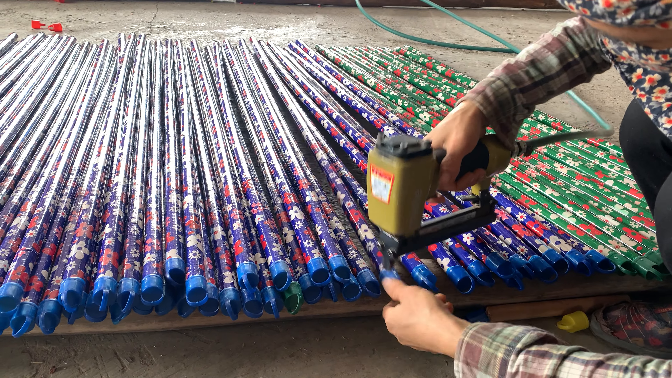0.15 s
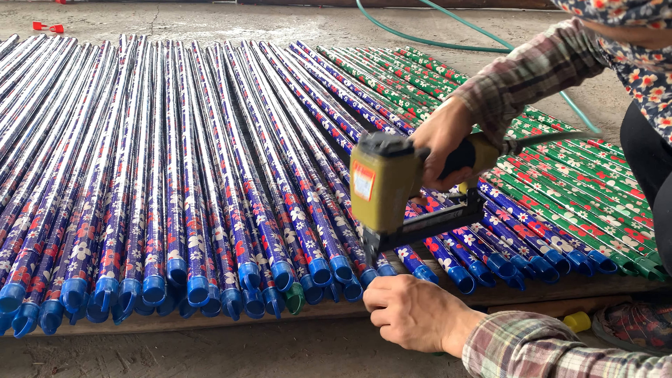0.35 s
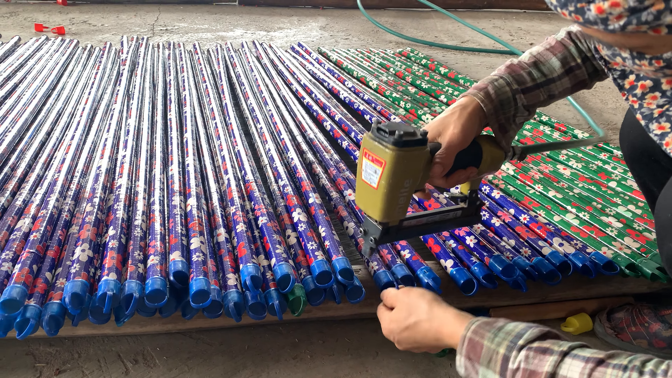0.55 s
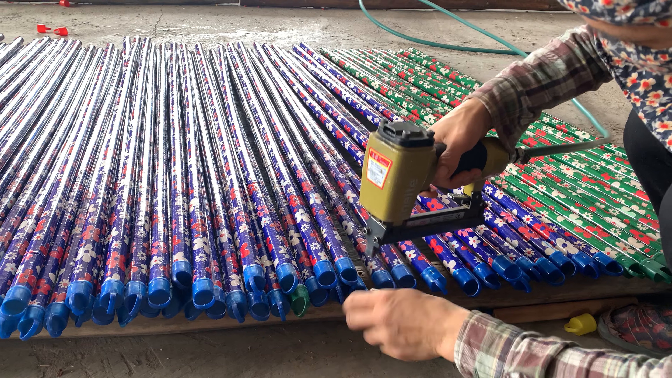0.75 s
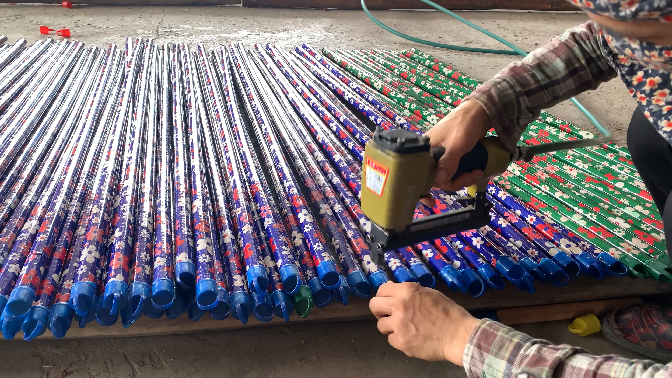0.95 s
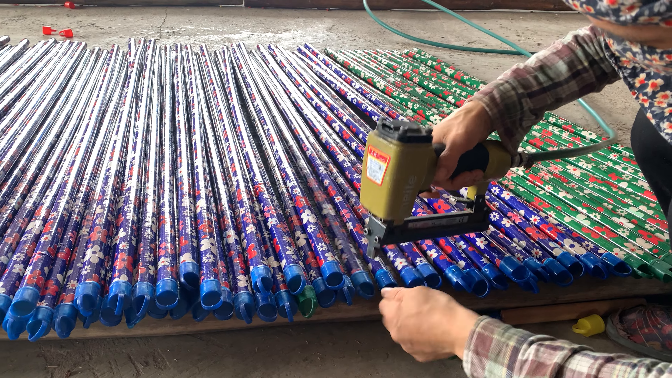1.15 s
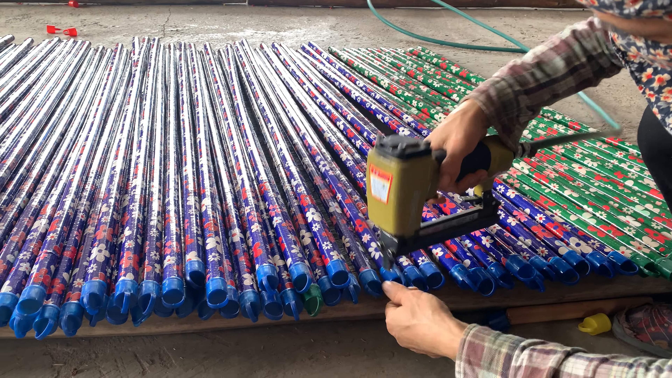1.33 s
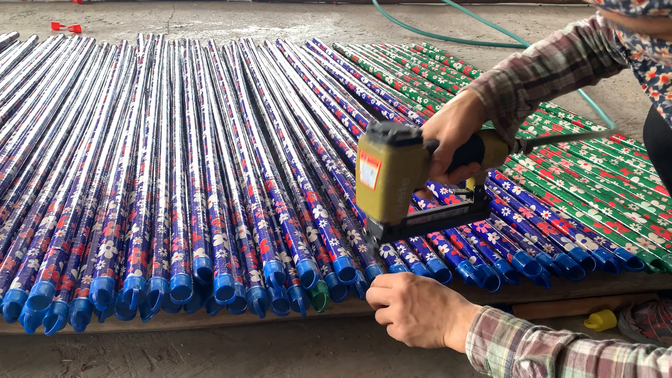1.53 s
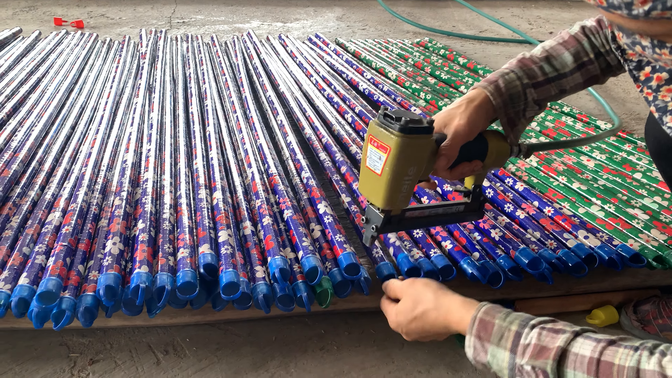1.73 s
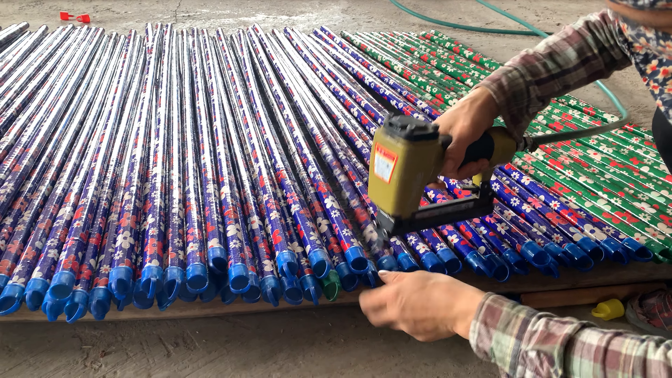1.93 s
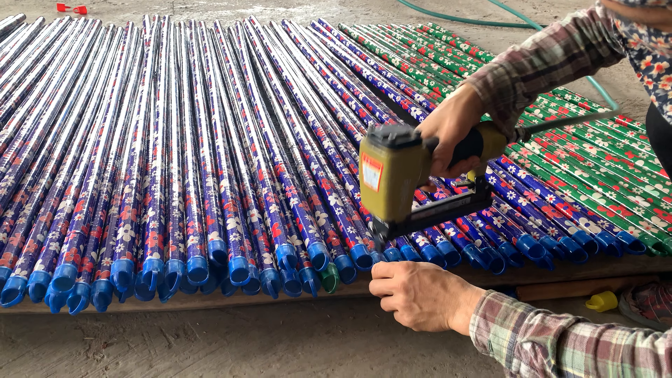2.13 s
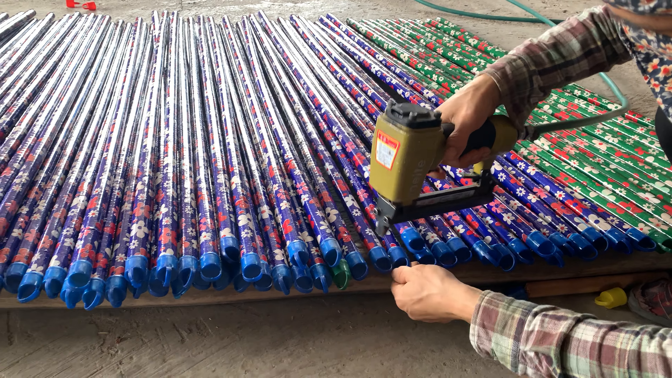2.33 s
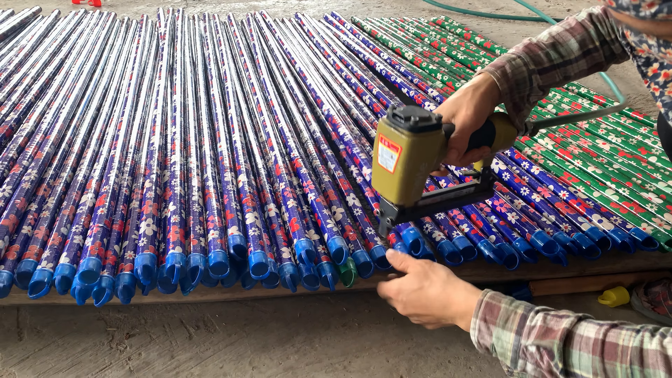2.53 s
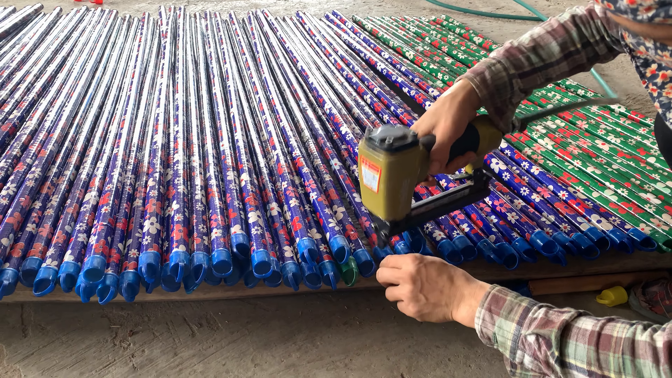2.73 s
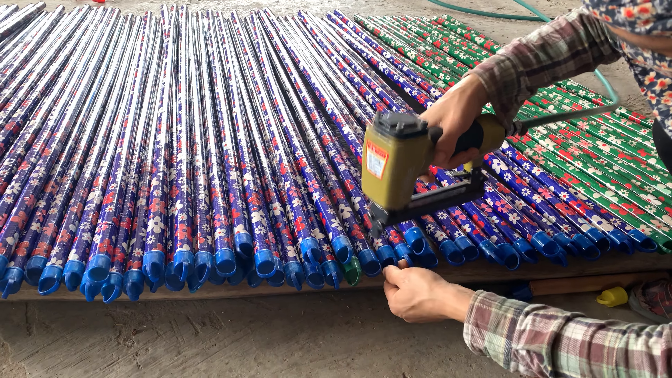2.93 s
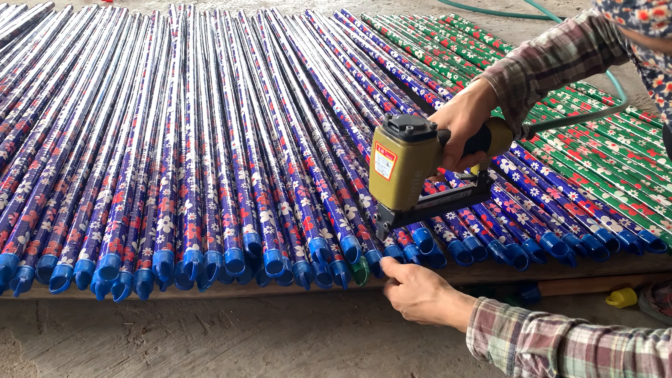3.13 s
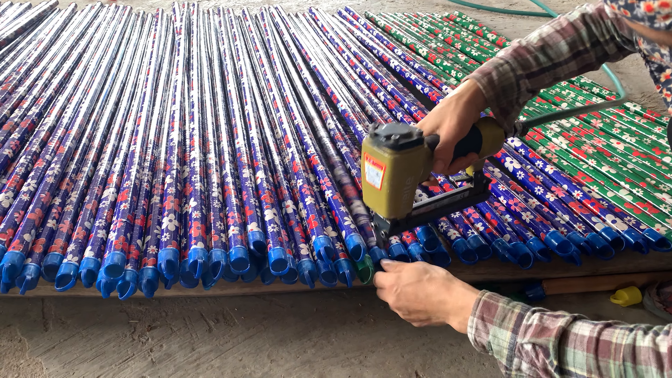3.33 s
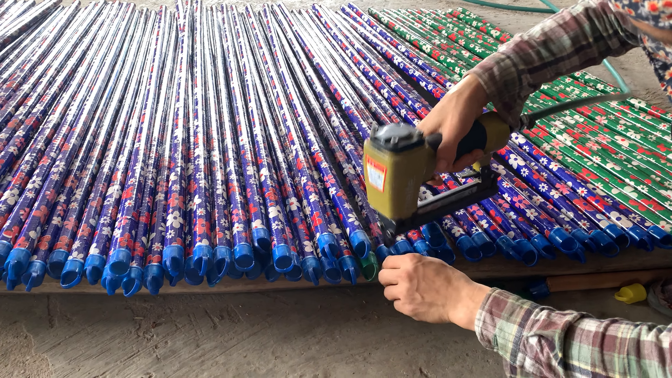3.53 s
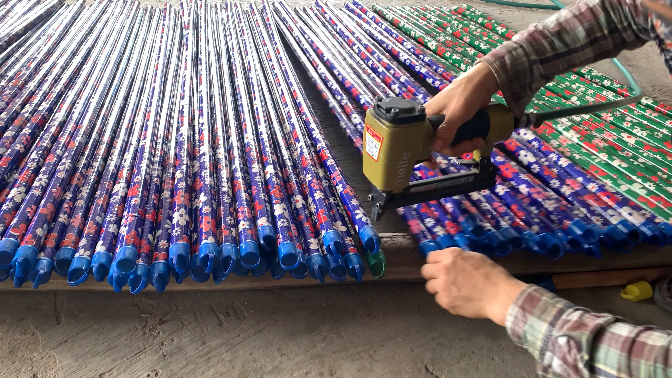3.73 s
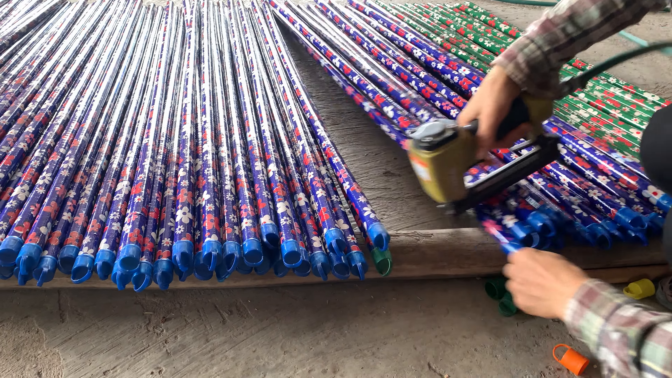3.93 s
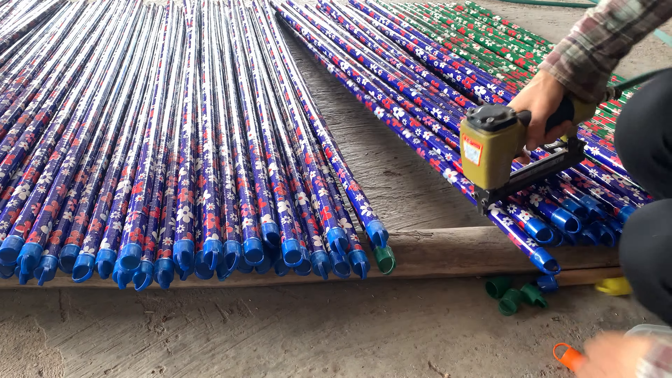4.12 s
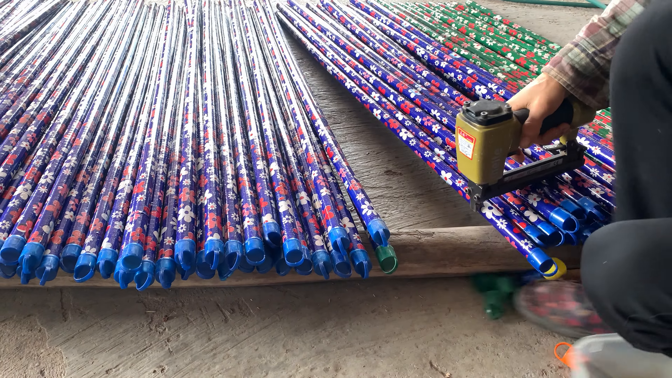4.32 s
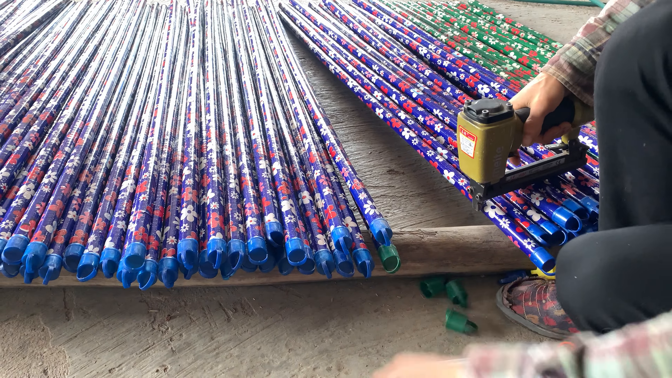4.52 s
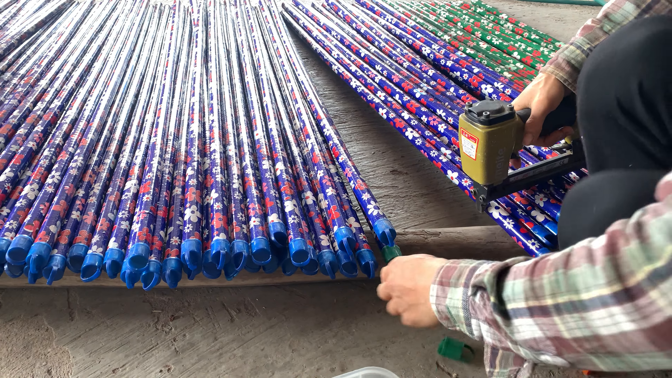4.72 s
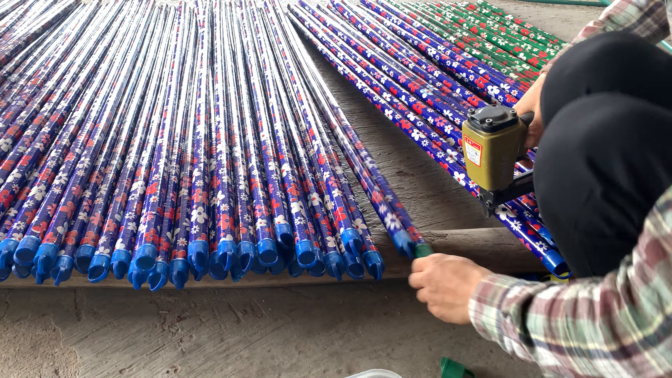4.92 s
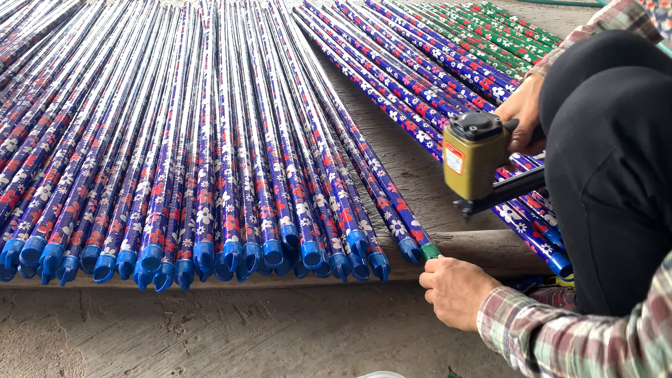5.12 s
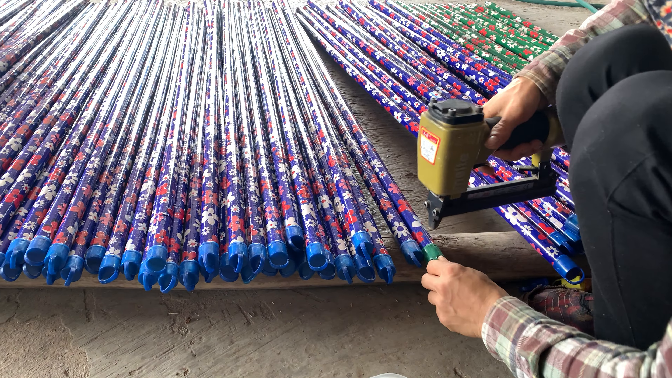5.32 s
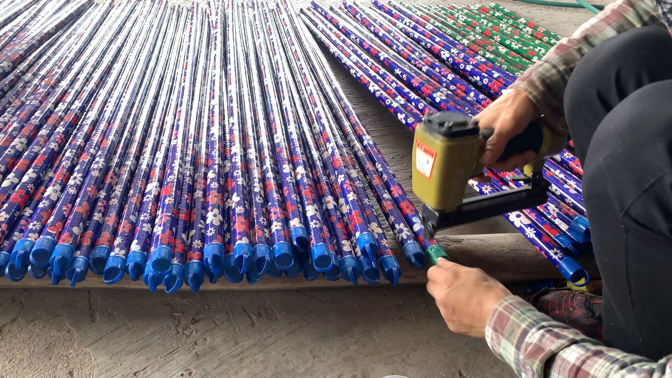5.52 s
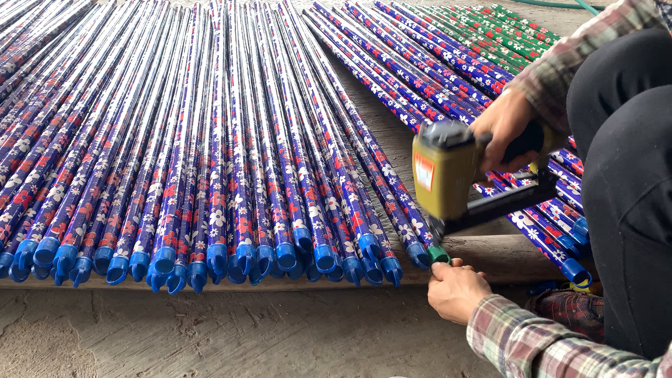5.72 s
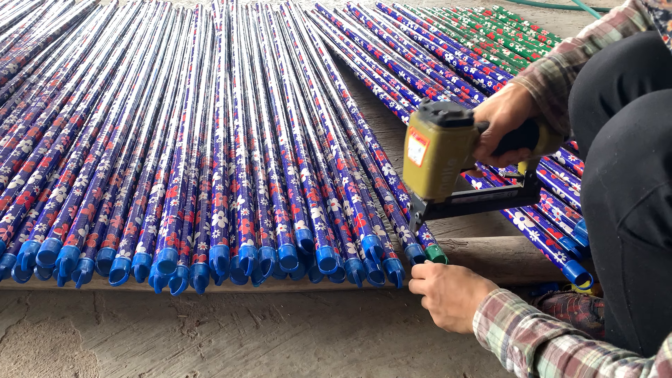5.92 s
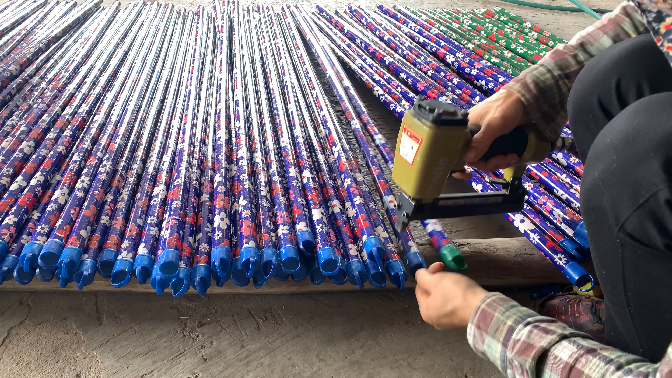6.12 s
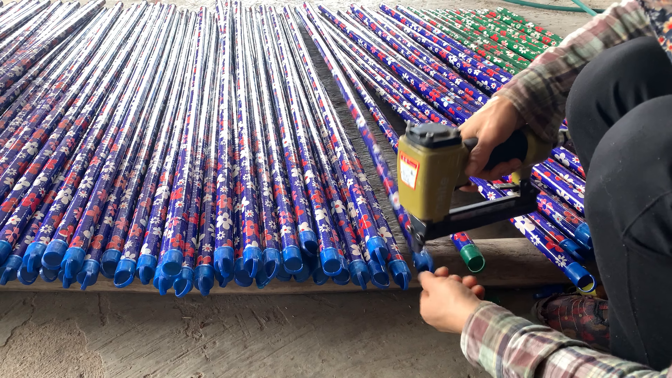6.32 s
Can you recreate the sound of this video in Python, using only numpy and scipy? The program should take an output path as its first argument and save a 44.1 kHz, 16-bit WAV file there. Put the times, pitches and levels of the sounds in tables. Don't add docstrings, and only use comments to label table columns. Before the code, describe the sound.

Close nail gun shots snap about four a second with puffing exhaust and brief tube ringing in a large shed, stop for handling taps, then restart.

```python
import sys
import numpy as np
from scipy import signal
from scipy.fft import rfft, irfft, next_fast_len
from scipy.io import wavfile
from scipy.ndimage import uniform_filter1d, map_coordinates

SR = 44100
rng = np.random.default_rng(int(sys.argv[2]) if len(sys.argv) > 2 else 0)


def to_wav(s):
    ch = np.atleast_2d(s).T
    pcm = np.round(np.clip(ch, -1, 1) * 32767)
    wavfile.write(sys.argv[1], SR, pcm.astype(np.int16))


def to_linear_factor(level_db):
    exponent = np.asarray(level_db, float) / 20
    return 10 ** exponent


N = 284886
EARLY = SR // 5
M = N + EARLY + SR


def unit(x):
    return x / np.sqrt(np.mean(x ** 2) + 1e-20)


def along(points, hz, axis=1):
    columns = np.transpose(points)
    return np.interp(np.log(hz + 1), np.log(columns[0] + 1), columns[axis])


def filtered(x, response):
    size = next_fast_len(x.shape[-1] + 8192)
    hz = np.fft.rfftfreq(size, 1 / SR)
    return irfft(rfft(x, size) * response(hz), size)[..., :x.shape[-1]]


# freq_hz, likeness (0 to 1)
NEAR = [(100, 0.95), (700, 0.71), (1900, 0.39), (3000, 0.64), (4200, 0.067), (7400, 0.61), (9000, 0.91),
        (15000, 0.93)]
# freq_hz, likeness (0 to 1)
FAR = [(60, 0.71), (130, 1), (290, 0.92), (640, 0.073), (1410, 0.049), (3100, 0.045), (6820, 0.11),
       (15000, 0.73)]


def spread(pair, alike):
    def weights(hz):
        turn = np.arccos(np.clip(along(alike, hz), -1, 1)) / 2
        return np.array([np.cos(turn), np.sin(turn)])

    mid, side = filtered(pair, weights)
    return np.array([mid + side, mid - side])


def rush(spectrum, alike):
    noise = rng.standard_normal((2, M))
    return unit(spread(filtered(noise, lambda hz: to_linear_factor(along(spectrum, hz))), alike))


def wobble(rate):
    knots = rng.standard_normal(int(M * rate / SR) + 4)
    return map_coordinates(knots, [np.arange(M) * rate / SR], order=1)


def grit(slow_db, fast_db):
    return to_linear_factor(slow_db * wobble(40) + fast_db * wobble(350))


def add(track, s, x):
    track[EARLY + round(s * SR):][:len(x)] += x


def shape(points, db):
    s, level_db = np.transpose(points)
    return s[0], to_linear_factor(db + np.interp(np.arange(s[0], s[-1], 1 / SR), s, level_db))


def swell_and_fall(t, db, rise_s, fall_s):
    return to_linear_factor(db + 20 * np.where(t < 0, t / rise_s, -t / fall_s))


SHARP = dict(attack=.0004, crest=.0007)
SOLID = dict(vary_db=1, detune=.02)
LOOSE = dict(vary_db=2, detune=.015, rough=.4)
LONG = dict(vary_db=1, detune=.002, rough=.2)


def ring(modes, attack, vary_db, detune, rough=0, crest=0):
    t = np.arange(SR // 4) / SR
    luck = rng.standard_normal((len(modes), 2))
    steps = rng.standard_normal((len(modes), 64))
    tones = 0
    for (hz, db, t60), (level_luck, pitch_luck), step in zip(modes, luck, steps):
        drift = rough * np.interp(t, np.linspace(0, t[-1], len(step)), np.cumsum(step))
        swing = 2 * np.pi * hz * (1 + detune * pitch_luck) * (t - crest) + drift
        wave = np.cos(swing) if crest else np.sin(swing)
        tones = tones + to_linear_factor(db + vary_db * level_luck - 60 * t / t60) * wave
    return tones * (1 - np.exp(-t / attack))


def resonant(x, peaks, plain_db):
    def response(hz):
        total = to_linear_factor(plain_db)
        for k, (centre, width, db) in enumerate(peaks):
            damping = 1j * hz * width
            total = total + (-1) ** k * to_linear_factor(db) * damping / (centre * centre - hz * hz + damping)
        return total

    return unit(filtered(x, response))


def boom(high_hz, low_hz, glide, t60):
    t = np.arange(SR // 4) / SR
    hz = low_hz + (high_hz - low_hz) * np.exp(-t / glide)
    return to_linear_factor(-60 * t / t60) * np.sin(2 * np.pi * np.cumsum(hz) / SR)


# start_s, blow_db, tube_ring_db, tube_pitch_hz, thump_db
SHOTS = [(-0.09, -13, -24.5, 1560, -31.5), (0.1938, -15.5, -29, 1496, -33.5),
         (0.4553, -15.5, -24.5, 1410, -36), (0.717, -14.5, -25, 1694, -33.5),
         (1.1084, -16, -20.5, 1820, -26.5), (1.3818, -16.5, -26.5, 1844, -38.5),
         (1.6738, -16, -29, 1427, -36.5), (1.9361, -16, -24.5, 1466, -31),
         (2.2298, -16, -27.5, 1500, -37.5), (2.4996, -16, -25.5, 1385, -39.5),
         (2.8066, -15, -23, 1548, -36.5), (3.085, -14.5, -32, 1460, -35), (3.366, -15, -28, 1410, -36.5),
         (3.6216, -16, -23, 1680, -38), (5.529, -17.5, -20, 1615, -29), (5.8064, -16, -30, 1620, -30),
         (6.0871, -15, -27, 1556, -37), (6.3595, -16.5, -27.5, 1564, -36.5)]
# housing_hz, trigger_hiss_db, thud_db, crack_db
GRIP = [(980, -2, 3.5, 2.5), (991, -2, 4.5, -0.5), (958, 0.5, -7.5, 0.5), (988, 0, 2.5, 0.5),
        (1030, 2, 3, 1), (940, 0, 4.5, 0), (964, 2.5, -2.5, 0.5), (970, 1, -1, 0), (961, 1.5, -3.5, 0),
        (950, -2, 6.5, 0.5), (955, 1, 5, 0), (977, 0, 3, 0.5), (969, -0.5, 1.5, 0.5), (986, 1, 3, 0),
        (1020, 0, 1.5, -1), (915, 3, -3, -0.5), (966, 3.5, 7.5, -0.5), (982, 0, -2.5, -0.5)]
# pitch_hz, level_db, t60_s
HOUSING = [(975, -4, 0.011), (1540, -7.5, 0.0044), (2480, 2.5, 0.0021), (3700, -17.5, 0.0087)]
# pitch_hz, level_db, t60_s
THUD = [(230, -9, 0.013), (310, -2, 0.024), (503, -5.5, 0.028)]
THUD_DB, THUD_GROWS = -29.5, 0.85


def knocks():
    body = np.zeros(M)
    for (s, knock_db, _, _, thump_db), (grip_hz, _, thud_db, _) in zip(SHOTS, GRIP):
        housing = [(grip_hz, *HOUSING[0][1:])] + HOUSING[1:]
        add(body, s + 0.00077, to_linear_factor(knock_db + 13) * ring(housing, **SHARP, vary_db=1.0, detune=.006))
        blow_db = THUD_DB + thud_db + THUD_GROWS * (thump_db + 33)
        add(body, s + 0.00393, -to_linear_factor(blow_db) * ring(THUD, attack=0.00045, **SOLID))
        bend = boom(high_hz=380, low_hz=55, glide=0.0034, t60=0.093)
        add(body, s + 0.00535, to_linear_factor(thump_db + 9.5) * bend)
    return body


# delay_s, level_db, rise_s, fall_s (per 20 dB)
SNAP = [
    (0, -24.5, 0.089, 0.0087),
    (.001, -1, .0006, 0.004),
    (.0042, 5.5, .0004, .0018),
    (.0062, -5, .001, 0.0074),
]
# freq_hz, density_db_per_hz
CRACK = [(600, -21), (2000, -6), (3000, -11), (4000, -16), (6900, -11.5), (7800, -5.5), (9900, -5.5),
         (14100, -9), (15300, -19.5), (16900, -45)]
# freq_hz, density_db_per_hz
HISS = [(1000, -21), (3000, -13.5), (7500, -4), (14000, -4), (16500, -40)]
BLOW_DB, CRACK_DB, CRACK_GROWS = -15.5, -12.5, 0.48
TRIGGER_S = 0.015


def cracks():
    air, hiss = np.zeros((2, M))
    for (s, knock_db, *_), (_, hiss_db, _, crack_db) in zip(SHOTS, GRIP):
        for delay, db, rise, fall in SNAP:
            t = np.arange(SR // 5) / SR - TRIGGER_S - delay
            db = db + (crack_db if delay else hiss_db)
            db = db + CRACK_DB + CRACK_GROWS * (knock_db - BLOW_DB)
            add(air if delay else hiss, s - TRIGGER_S, swell_and_fall(t, db, rise, fall))
    return air * to_linear_factor(1.6 * wobble(1500)) * rush(CRACK, NEAR) + hiss * rush(HISS, NEAR)


# t60_s, second_hz, second_db, third_hz, third_db
TONES = [(.05, 1251, -9, 2580, -3), (.05, 1394, -4.5, 1174, -5.5), (.05, 2000, 3, 1610, -14),
         (.05, 2025, 1, 1350, -12.5), (.05, 1470, -5.5, 2648, -4), (.05, 1414, -9.5, 1166, -10.5),
         (.05, 1740, -7.5, 1132, -3.5), (.05, 1768, -7, 1600, -16), (.05, 2184, -3, 1284, -10),
         (.05, 2033, -1.5, 1698, -4.5), (.075, 2250, -3.5, 1850, -11), (.05, 2240, 2.5, 1704, -2.5),
         (.05, 1683, 0.5, 2013, -12.5), (.05, 1400, -8, 2030, -14.5), (.06, 1280, -12, 2300, -9),
         (.06, 1287, -5.5, 1460, -11), (.05, 2320, -1, 1250, -9), (.05, 1690, -5, 1448, -13)]
# first_hz, first_db, second_hz, second_db, third_hz, third_db
LINGER = [(1174, -51, 1793, -54, 1416, -54), (904, -49, 1510, -51, 1179, -53),
          (1445, -49, 1607, -49, 2040, -51), (1375, -49, 2024, -53, 980, -53),
          (1246, -48, 1900, -49, 1470, -49), (1160, -48, 1849, -49, 1418, -49),
          (1174, -51, 1793, -54, 1416, -54), (1453, -50, 1768, -52, 977, -54),
          (1871, -52, 1319, -54, 2546, -56), (1402, -52, 1698, -54, 2772, -57),
          (1553, -41, 2248, -49, 1233, -50), (1305, -53, 964, -54, 1610, -55),
          (1688, -51, 1400, -51, 1128, -57), (1822, -52, 1561, -53, 1289, -54),
          (1615, -41, 1268, -45, 2288, -46), (1602, -44, 999, -49, 1319, -51),
          (1553, -47, 2280, -50, 1235, -51), (1314, -53, 697, -53, 1588, -53)]
# start_s, level_db, pitch_hz, t60_s
REBOUNDS = [(5.568, -42, 1500, 0.095), (5.568, -40, 1620, 0.084), (5.57, -37, 2900, 0.074),
            (5.545, -43, 700, 0.065), (5.575, -42, 1600, 0.13), (6.37, -43, 697, .14),
            (5.57, -45, 2730, .25), (5.59, -46, 3600, 0.16), (5.595, -46, 3200, 0.072),
            (5.602, -47, 2700, .07), (3.6, -44, 2500, 0.054), (2.856, -42, 1600, .06),
            (3.17, -42, 1600, 0.093), (2.8, -38, 1700, .07), (2.6, -43.5, 1400, .06),
            (0.65, -38.5, 1850, .05), (1.153, -44, 1820, .04), (1.16, -43.5, 1200, 0.065),
            (6.349, -40, 1600, 0.0301), (6.304, -37, 1620, .04), (6.09, -26.5, 325, 0.046),
            (3, -44.5, 2000, .04), (3.8, -48, 1900, .04)]
RING_SHARE = 0.88
LINGER_DB, LINGER_S = 10, .16


def tubes_ring():
    tubes = np.zeros((2, M))
    for (s, _, tube_db, tube_hz, _), (t60, hz2, db2, hz3, db3), last in zip(SHOTS, TONES, LINGER):
        t60 = RING_SHARE * t60
        tube = [(tube_hz, 3, t60), (hz2, 3 + db2, t60), (hz3, 3 + db3, t60)]
        linger = [(hz, db + LINGER_DB, LINGER_S) for hz, db in zip(last[::2], last[1::2])]
        for side in tubes:
            add(side, s + 0.0086, to_linear_factor(tube_db + 5.5) * ring(tube, attack=0.0027, **LONG))
            add(side, s + .006, ring(linger, attack=.012, **LONG))
    for s, db, hz, t60 in REBOUNDS:
        for side, nearer_db in zip(tubes, (0, 5)):
            add(side, s, to_linear_factor(db + nearer_db) * ring([(hz, 0, t60)], attack=.002, **LONG))
    return tubes


# time_s, level_db
JOSTLE = [(.003, -28), (.006, 2.5), (.012, -2), (.022, -15), (.09, -27.5), (.16, -50.5)]
# freq_hz, density_db_per_hz
ROW = [(400, -22), (800, -11), (1500, -10), (2300, -9), (4000, -13.5), (5500, -20.5), (16000, -52)]
# pitch_hz, width_hz, level_db
NEIGHBOURS = [(1210, 17, -8.5), (1410, 56, 3), (1470, 50, -2), (1680, 31, 2.5), (2013, 29, -9),
              (2130, 66, -4.5), (2320, 16, -10), (2640, 120, -0.5), (3400, 39, -14.5), (4090, 76, -1.5)]
JOSTLE_DB, JOSTLE_GROWS = -27.5, 0.8


def jostling():
    row = np.zeros(M)
    for s, _, tube_db, *_ in SHOTS:
        start, curve = shape(JOSTLE, JOSTLE_DB + JOSTLE_GROWS * (tube_db + 27.5))
        add(row, s + start, curve)
    contact = resonant(rush(ROW, NEAR), NEIGHBOURS, plain_db=-8.0)
    return row * grit(slow_db=2, fast_db=2.5) * contact


# freq_hz, density_db_per_hz
FLOOR = [(20, -46.5), (35, -19.5), (55, -8), (90, -10.5), (135, -7), (200, -17), (400, -20), (1000, -22),
         (2500, -29.5), (6000, -31), (9000, -29.5), (14200, -25.5), (15700, -31), (16300, -65.5)]
# pitch_hz, width_hz, level_db
HUM = [(50, 16, -71), (134, 8, -69), (274, 2, -70.5), (424, 3, -82.5), (543, 3, -80), (818, 4, -81),
       (970, 3, -85), (1010, 6, -82)]
FLOOR_DB = -57.5


def floor():
    hum = np.zeros(M)
    for centre, width, db in HUM:
        line = filtered(rng.standard_normal(M), lambda hz: 1 / (1 + ((hz - centre) / width) ** 2))
        hum += to_linear_factor(db) * unit(line)
    drift_db = 1.2 * wobble(5)
    return to_linear_factor(FLOOR_DB - 5.0 + drift_db) * rush(FLOOR, FAR) + hum


# freq_hz, level_db, t60_s
HALL = [(60, -42, 0.54), (300, -33.5, 0.74), (1520, -33, 0.6), (4000, -26.5, 0.56), (5590, -27.5, 0.44),
        (9570, -31, 0.55), (15000, -41.5, 0.79)]


def hall(x):
    hz, t, z = signal.stft(x, SR, nperseg=512)
    t, hz = t[:300], hz[:, None]
    power = np.abs(z) ** 2
    power = np.where(hz < 3500, power, uniform_filter1d(power, size=12, axis=0))
    swell = (1 - 0.18 * np.exp(-(t / 0.0054) ** 2)) * (t > .008)
    decay = swell * to_linear_factor(along(HALL, hz) + 5.0 - 60 * t / along(HALL, hz, axis=2))
    smooth = uniform_filter1d(power, size=3, axis=0)
    stored = signal.fftconvolve(smooth, decay ** 2, axes=1)[:, :z.shape[1]]
    modes = uniform_filter1d(rng.standard_normal(stored.shape), size=24, axis=1)
    stored = stored * to_linear_factor(5 * unit(modes) * (hz < 5000))
    patches = uniform_filter1d(rng.standard_normal(stored.shape), size=4, axis=0)
    patches = uniform_filter1d(patches, size=5, axis=1)
    stored = stored * to_linear_factor(np.where(hz < 5000, 4.5, 1.5) * unit(patches))
    noise = signal.stft(rng.standard_normal((2, M)), nperseg=512)[2]
    wet = signal.istft(noise / np.std(noise) * np.sqrt(np.abs(stored)), nperseg=512)[1][:, :M]
    return spread(wet, FAR)


# delay_s, level_db
WALL = [
    (.0298, -22),
    (.061, -28),
]
SCATTER_S = .012


def wall(x, tool):
    def returns(hz):
        echoes = sum(to_linear_factor(db + 2.5) * np.exp(-2j * np.pi * hz * s) for s, db in WALL)
        return echoes / (1 + (7000 / (hz + 1)) ** 4)

    def knock_return(hz):
        band = 1 / (1 + (800 / (hz + 1)) ** 4) / (1 + (hz / 2400) ** 6)
        return band * np.exp(-2j * np.pi * hz * WALL[0][0])

    t = np.arange(SR // 50) / SR
    facets = rng.standard_normal(len(t)) * to_linear_factor(-20 * t / SCATTER_S)
    facets = irfft(rfft(facets) / np.abs(rfft(facets)))
    bright = signal.fftconvolve(filtered(x, returns), facets / np.linalg.norm(facets))[:M]
    return bright + to_linear_factor(-26) * filtered(tool, knock_return)


# start_s, first_rush_db, stop_knock_db
VENTS = [(0.11, -13, -23), (0.385, -13.5, -21.5), (0.634, -11.5, -20.5), (0.9718, -14, -22.5),
         (1.3072, -14, -22.5), (1.5944, -12.5, -22), (1.8507, -12.5, -22), (2.152, -12.5, -22.5),
         (2.4195, -14.5, -21.5), (2.7217, -14.5, -21.5), (3.0004, -12.5, -20.5), (3.2827, -16, -21.5),
         (3.546, -13, -23.5), (3.788, -13.5, -22), (5.7343, -13, -22.5), (6.0138, -13.5, -20.5),
         (6.279, -12.5, -21.5)]
# body_hz, nose_hz, nose_over_body_db, second_rush_db
SEATS = [(996, 1472, -10, 0), (976, 1650, -8, 1.5), (996, 1661, -6.5, 0), (993, 1900, -7.5, -0.5),
         (960, 1456, -11, -1), (980, 1467, -11, 0.5), (960, 1472, -8, -1), (1010, 1483, -5.5, -0.5),
         (985, 1502, -5, -1.5), (980, 1534, -2, -1.5), (1020, 1545, -0.5, -1), (977, 1534, 0, -1),
         (990, 1542, 0, -3.5), (987, 1567, 0.5, -2), (1040, 1650, -0.5, -1), (1050, 1634, 0.5, -0.5),
         (1020, 1618, 0.5, 0.5)]
# time_s, level_db
LEAK = [(-.03, -62.5), (-.012, -38.5), (-.008, -29.5), (-.005, -35.5), (-.0021, -30), (-.0015, -8.5),
        (.0005, -5.5), (.003, 2.5), (.0045, 3.5), (.0075, -5.5)]
# time_s, level_db
FADE = [(.007, 2), (.009, 3.5), (.0115, 7), (.014, 0), (.018, -19), (.03, -18), (.08, -36), (.1, -74)]
# freq_hz, density_db_per_hz
JET = [(300, -20), (1000, -20.5), (2270, -14), (3000, -15.5), (4380, -11.5), (6200, -7.5), (7200, -4.5),
       (8100, -5), (11500, -2.5), (14700, -2), (15900, -23.5), (16900, -54.5)]
RUSH_DB, SECOND_DB, TRADE = -13, -17.5, 0.52


def air_jets():
    gain = np.zeros(M)
    for (s, first_db, _), (*_, second_db) in zip(VENTS, SEATS):
        second_db = SECOND_DB + second_db - TRADE * (first_db - RUSH_DB)
        for points, db in (LEAK, first_db), (FADE, second_db):
            start, curve = shape(points, db)
            add(gain, s + start, curve)
    return gain * to_linear_factor(0.9 * wobble(900) + 0.81 * wobble(2500)) * rush(JET, NEAR)


# pitch_hz, level_db, t60_s
POP = [(2300, -26.5, 0.01)]
# pitch_hz, level_db, t60_s
START = [(53, -26.5, 0.13), (118.2, -23.5, .045), (225, -24.5, 0.023)]
# pitch_hz, level_db, t60_s
BENCH = [(124.8, -17.5, 0.027), (247, -25.5, 0.014)]
# pitch_over_body, level_db, t60_s
STOP = [(.667, -3.5, 0.023), (1, -3, .038), (1.95, -7.5, .026), (2.5, -9, 0.023), (2.83, -6.5, 0.026),
        (3.6, -13.5, 0.038), (4.4, -14, .02)]
RETURN_S, SETS_OFF_S, LANDS_S = .0118, 0.00829, 0.01604


def piston_returns():
    body = np.zeros(M)
    for (s, _, knock_db), (body_hz, nose_hz, nose_db, _) in zip(VENTS, SEATS):
        add(body, s + .0015, ring(POP, attack=.001, **LOOSE))
        recoil = ring(START[:1], attack=0.00041, **SOLID)
        recoil = recoil - ring(START[1:], attack=0.00057, crest=0.00077, **SOLID)
        add(body, s + SETS_OFF_S, recoil)
        add(body, s + LANDS_S, -ring(BENCH, attack=0.00074, crest=0.00091, **SOLID))
        modes = [(share * body_hz, db, t60) for share, db, t60 in STOP]
        modes += [(nose_hz, nose_db - 2.5, .043)]
        chatter = ring(modes, attack=0.003, vary_db=1.0, detune=.005)
        t = np.arange(len(chatter)) / SR
        chatter *= 1 / (1 + (t / 0.0058) ** 4.4)
        add(body, s + RETURN_S, to_linear_factor(knock_db + 13.5) * chatter)
    return body


# start_s, peak_db, pitch_hz
RATTLE = [(0.319, -32.5, 1920), (3.714, -35, 1730), (3.774, -24.5, 1680), (3.852, -47, 4470),
          (3.909, -40, 1440), (3.94, -32, 1446), (3.974, -29.5, 1680), (4.008, -42, 1690),
          (4.058, -43, 1630), (4.079, -36, 1500), (4.099, -24, 2243), (4.119, -46, 1650),
          (4.155, -28, 2810), (4.225, -40, 3020), (4.252, -35, 3180), (4.253, -40.5, 4650),
          (4.156, -35, 4500), (4.101, -35.5, 3680), (4.551, -46, 1100), (4.615, -51, 1300),
          (4.33, -34, 2730), (4.356, -47, 1696), (4.383, -46, 3400), (4.396, -41, 3000), (4.451, -41, 1100),
          (4.453, -44, 2200), (4.454, -43, 4050), (4.462, -44, 3100), (4.48, -49, 1090), (4.563, -46, 2700),
          (4.603, -47, 1910), (4.63, -49.5, 3600), (4.68, -41, 1980), (4.727, -43, 2500),
          (4.745, -50, 3200)]
# start_s, level_db
SNAPS = [
    (0.319, -33),
    (3.772, -37.5),
    (3.852, -49),
    (4.45, -35.5),
    (4.555, -44),
    (4.68, -43),
    (3.944, -43.5),
    (4.031, -43.5),
    (4.116, -48.5),
]
# start_s, level_db
SETTLE = [
    (4.949, -50.5),
    (4.98, -56.5),
    (5.017, -48),
    (5.043, -47.5),
    (5.059, -50),
]
# pitch_hz, level_db, t60_s
RESTING = [(418, -7, 0.049), (1320, -2.5, 0.032), (1630, -5.5, 0.07)]
TICK_DB = -19.5


def taps():
    tones, ticks = np.zeros((2, M))
    t = np.arange(600) / SR
    for s, db, hz in RATTLE:
        cap = [(hz, 0, .04), (1.45 * hz, -8, .018), (.7 * hz, -8, .02), (1.9 * hz, -14, .012)]
        add(tones, s, to_linear_factor(db - 4.5) * ring(cap, attack=0.00097, **LOOSE))
        add(ticks, s, to_linear_factor(db + TICK_DB - 60 * t / .005))
    for s, db in SNAPS:
        add(ticks, s, to_linear_factor(db - 60 * t / 0.0026))
    for s, db in SETTLE:
        add(tones, s, to_linear_factor(db) * ring(RESTING, attack=0.0021, **LOOSE))
    contact = [(500, -5), (1500, -1.5), (4500, -15.0), (8000, -11.5), (14000, -16.5), (16000, -41.0)]
    return tones + ticks * rush(contact, NEAR)


# time_s, effort_db
PUSH = [(3.8, -71), (3.9, -51.5), (4.12, -52), (4.2, -50.5), (4.29, -57), (4.38, -53), (4.43, -59),
        (4.46, -52), (4.52, -55.5), (4.62, -55.5), (4.66, -59), (4.73, -57.5), (4.8, -66.5), (5.15, -72)]
SHAKE_DB, SHAKE_S = -18.5, 0.023
DRAG_DB = -8.5


def scrapes():
    push, shaken = np.zeros((2, M))
    add(push, *shape(PUSH, 0))
    for s, db, _ in RATTLE:
        add(shaken, s, to_linear_factor(db + SHAKE_DB - 20 * np.arange(SR // 10) / SR / SHAKE_S))
    metal = [(500, -14.5), (1100, -7.5), (1600, 0.0), (4000, -1.5), (6000, -20), (16000, -47.5)]
    scrape = resonant(rush(metal, FAR), NEIGHBOURS, plain_db=-4.0)
    scrape = to_linear_factor(-6.0) * (push + shaken) * grit(slow_db=2, fast_db=2) * scrape
    wood = [(120, -14.5), (250, -5.5), (600, -7.0), (1100, -3), (1800, -34.5)]
    drag = to_linear_factor(DRAG_DB) * push * grit(slow_db=4.0, fast_db=1.0) * rush(wood, FAR)
    return scrape + drag


ROLL_S, ROLL_DB = (3.87, 4.14), -54


def rolling():
    roll = np.zeros(M)
    add(roll, ROLL_S[0], to_linear_factor(ROLL_DB) * np.ones(round((ROLL_S[1] - ROLL_S[0]) * SR)))
    peaks = [(1650, 89, 1.5), (2260, 150, -6.5)]
    song = resonant(rng.standard_normal((2, M)), peaks, plain_db=-49.5)
    return roll * grit(slow_db=1, fast_db=1.0) * song


# peak_s, level_db, rise_s, fall_s (per 20 dB)
CLOTH = [
    (3.88, -60, .1, 0.21),
    (4.05, -64, .15, .09),
    (4.25, -67.5, .07, .3),
    (4.68, -65, .1, 0.1),
    (4.95, -69, .2, .2),
    (4.53, -57, 0.33, 0.33),
    (5.29, -67, 0.17, .04),
    (5.5, -62, 0.16, 0.055),
]


def cloth():
    gain = np.zeros(M)
    for s, db, rise, fall in CLOTH:
        t = (np.arange(M) - EARLY) / SR - s
        gain += swell_and_fall(t, db, rise, fall)
    fabric = [(3000, -28.5), (8000, -9.0), (14000, -6.0), (15700, -10.5), (16100, -41.5)]
    return gain * grit(slow_db=3.5, fast_db=4) * rush(fabric, FAR)


# pitch_hz, width_hz, level_db
CLANK = [(1300, 38, -7), (1630, 170, -3.5), (2390, 30, 1), (2840, 48, -2), (3290, 29, -8), (4130, 75, -0.5),
         (5150, 33, -11), (5590, 47, -5)]


def far_clatter():
    gain = np.zeros(M)
    swell = [(5.16, -25), (5.165, -15), (5.18, -13), (5.184, 2), (5.2, -2), (5.26, -8),
             (5.33, -17.5), (5.42, -37)]
    add(gain, *shape(swell, -50.5))
    band = lambda hz: 1 / (1 + (hz / 7000) ** 8) / (1 + (1100 / (hz + 1)) ** 4)
    metal = resonant(filtered(rng.standard_normal((2, M)), band), CLANK, plain_db=-18.0)
    return gain * grit(slow_db=0.5, fast_db=1.0) * metal


# pitch_hz, level_db, t60_s
CLANG = [(5590, -51, .09), (4350, -49, .03), (6800, -56, .02), (2800, -55, .08), (1650, -61, .08)]


def far_clang():
    track = np.zeros(M)
    add(track, 5.182, ring(CLANG, attack=.001, **LONG))
    return track


# freq_hz, left_minus_right_db
LEFT = [(60, .5), (200, 0), (380, -.5), (700, -3.5), (1290, -3.5), (2380, .5), (4400, 1.5), (8120, 0)]
# freq_hz, left_leads_radians
LEAD = [(0, -.25), (1500, -.4), (3100, -3), (4400, -9.6), (5300, -11.1), (7400, -16.3), (8600, -19.1),
        (10300, -19), (16000, -20.3)]
VENT_ECHO_DB = -6.5


def scene():
    shot = knocks() + cracks() + tubes_ring() + jostling()
    vent = air_jets() + piston_returns()
    near = shot + vent + taps() + far_clang()
    shuffle = scrapes() + rolling() + cloth() + far_clatter()

    def sides(hz):
        half = to_linear_factor(.65 * along(LEFT, hz)) * np.exp(.5j * np.interp(hz, *np.transpose(LEAD)))
        return np.array([half, 1 / half])

    ports = filtered(near, sides)
    duck = np.zeros(M)
    for row in SHOTS:
        add(duck, row[0] + .005, np.exp(-(np.arange(3000) / SR / .022) ** 2))
    room = hall(near[0]) + wall(shot[0] + to_linear_factor(VENT_ECHO_DB) * vent[0], near[0])
    return (ports + to_linear_factor(-9 * duck) * (room + shuffle + floor()))[:, EARLY:EARLY + N]


def top_cut(x):
    return signal.sosfilt(signal.butter(12, 16970, fs=SR, output="sos"), x)


def record(dry):
    heard = filtered(dry, lambda hz: 1 / (1 + 40 / (1j * hz + 1e-9)) ** 2)
    heard = heard / (1 + (heard / .85) ** 6) ** (1 / 6)
    heard = filtered(heard, lambda hz: 1 / (1 + (hz / 16600) ** 60))
    return top_cut(heard)


dry = scene()
out = record(dry)
to_wav(out)
```